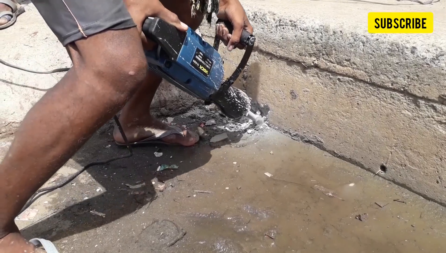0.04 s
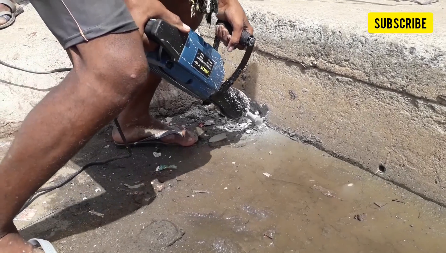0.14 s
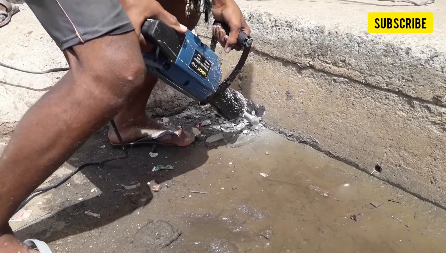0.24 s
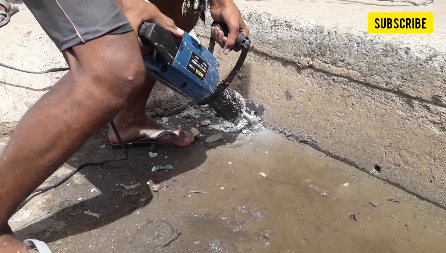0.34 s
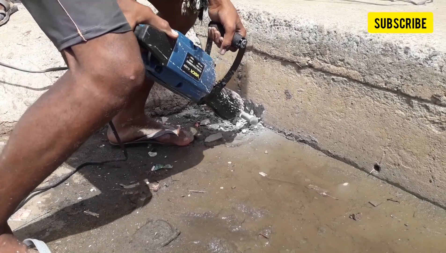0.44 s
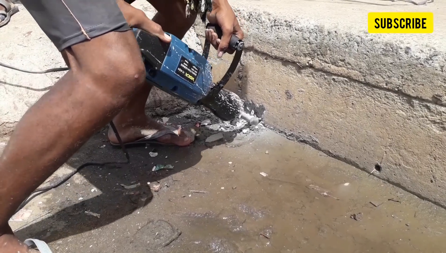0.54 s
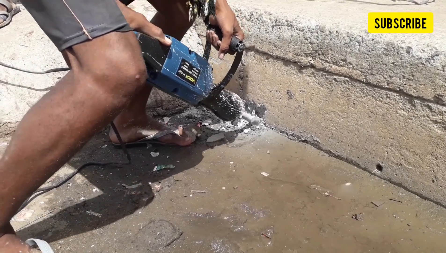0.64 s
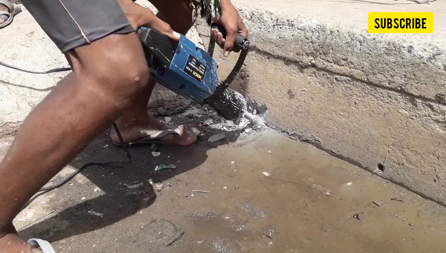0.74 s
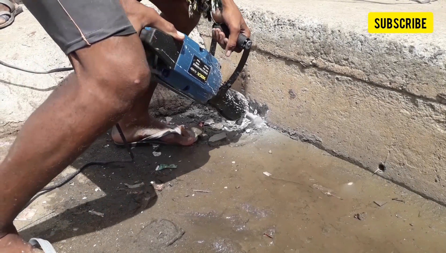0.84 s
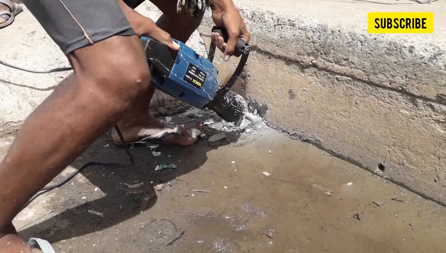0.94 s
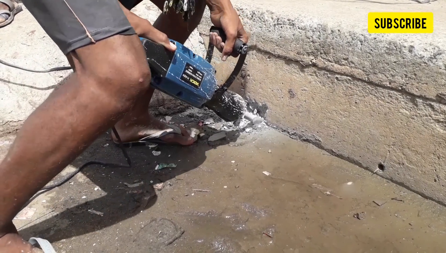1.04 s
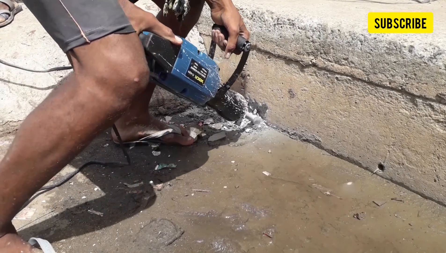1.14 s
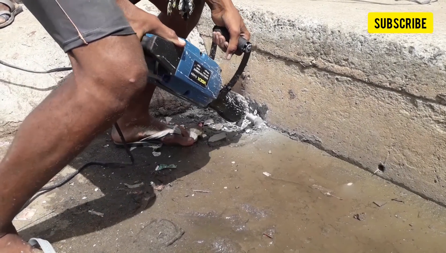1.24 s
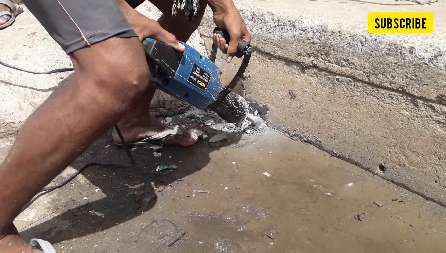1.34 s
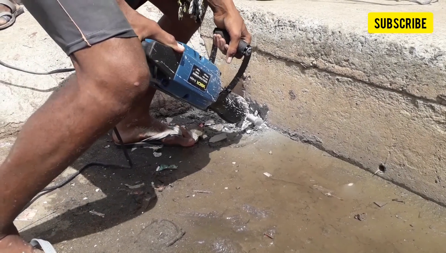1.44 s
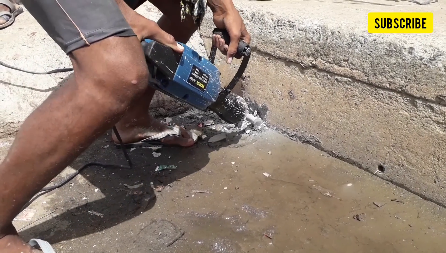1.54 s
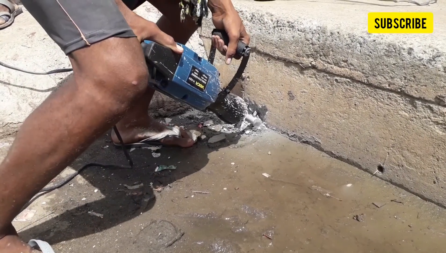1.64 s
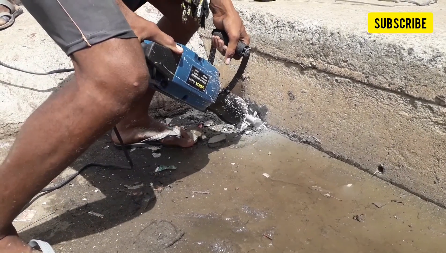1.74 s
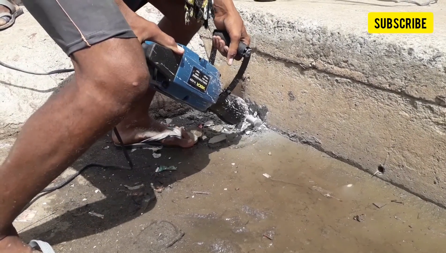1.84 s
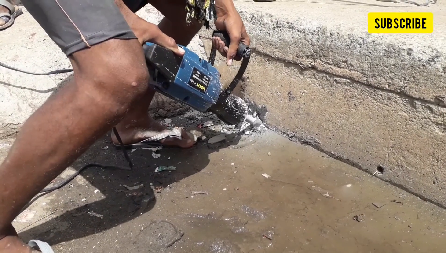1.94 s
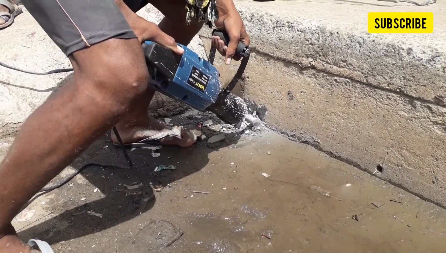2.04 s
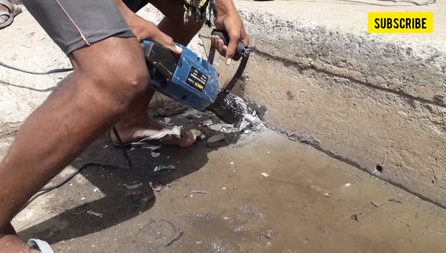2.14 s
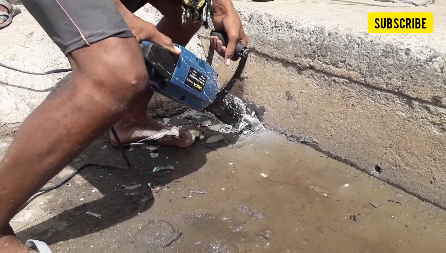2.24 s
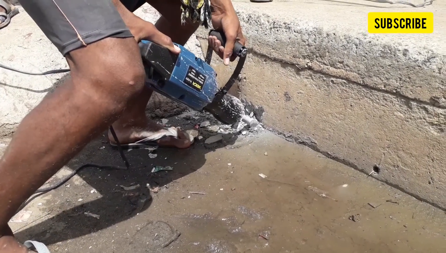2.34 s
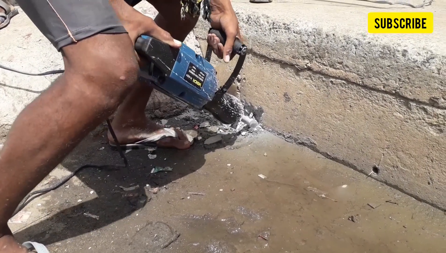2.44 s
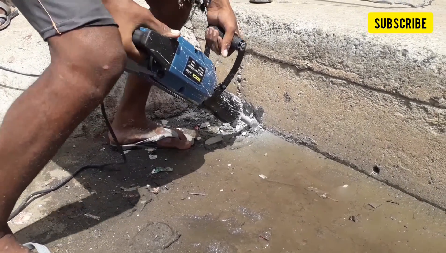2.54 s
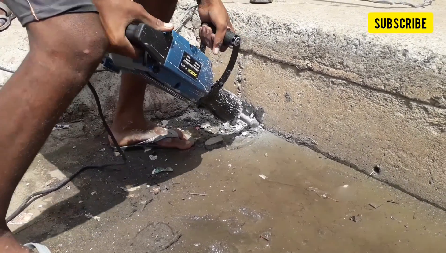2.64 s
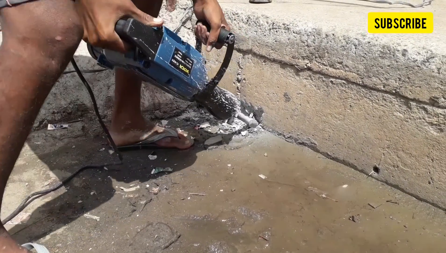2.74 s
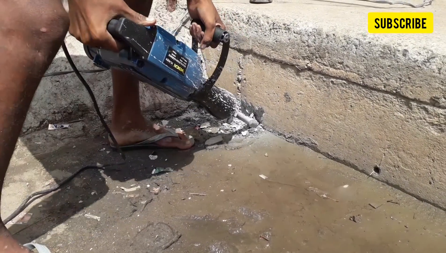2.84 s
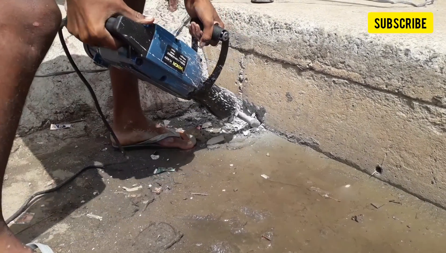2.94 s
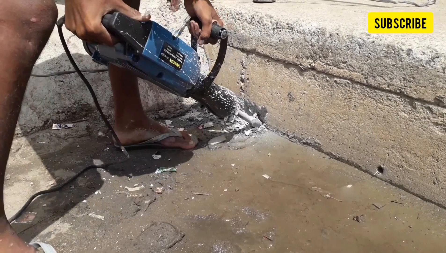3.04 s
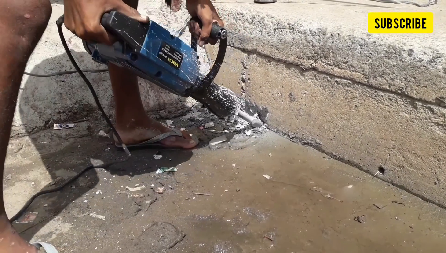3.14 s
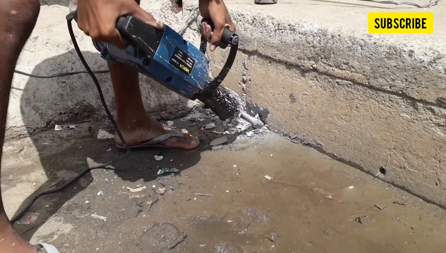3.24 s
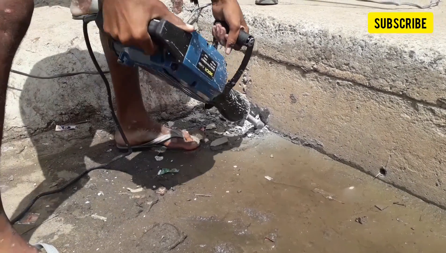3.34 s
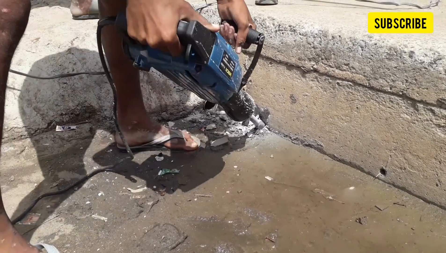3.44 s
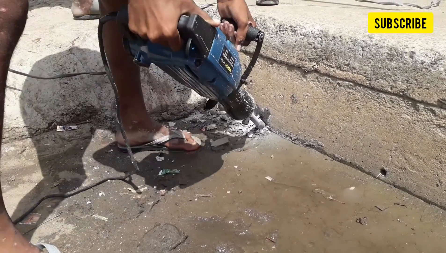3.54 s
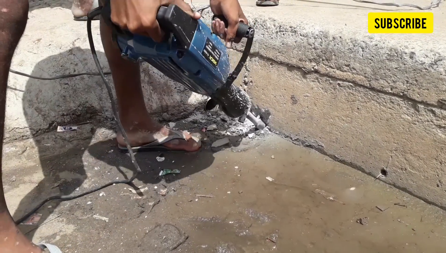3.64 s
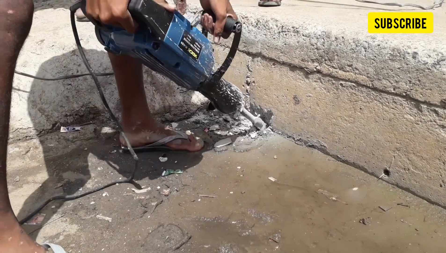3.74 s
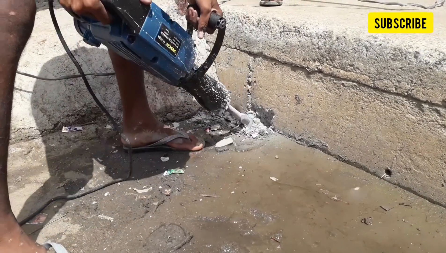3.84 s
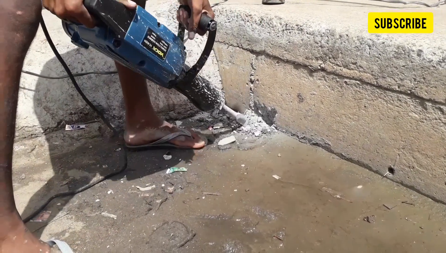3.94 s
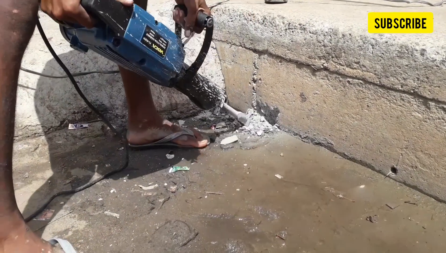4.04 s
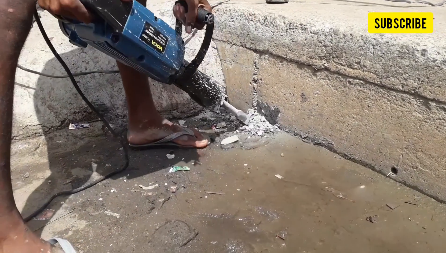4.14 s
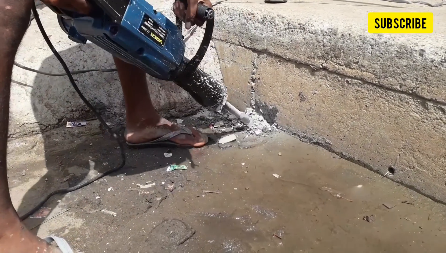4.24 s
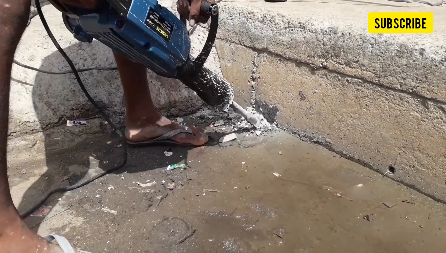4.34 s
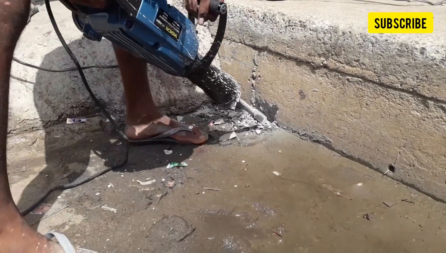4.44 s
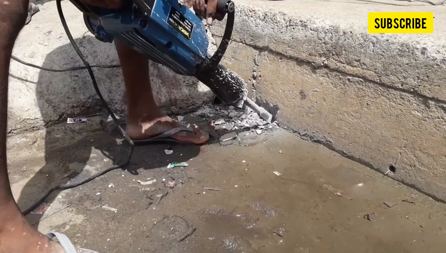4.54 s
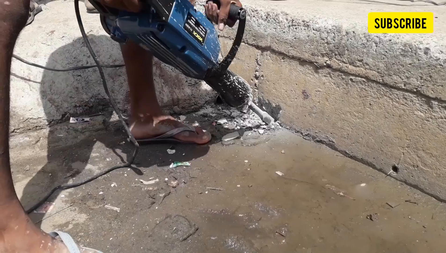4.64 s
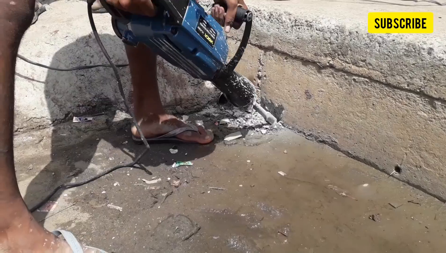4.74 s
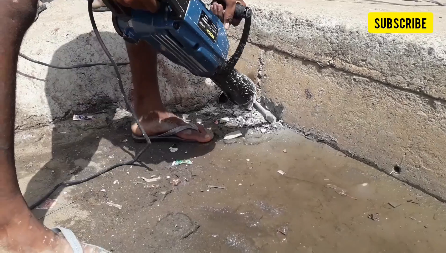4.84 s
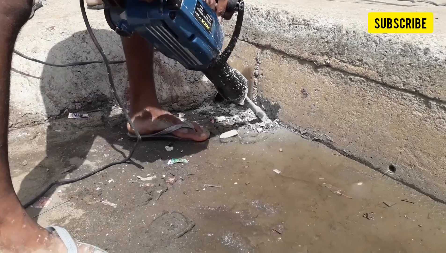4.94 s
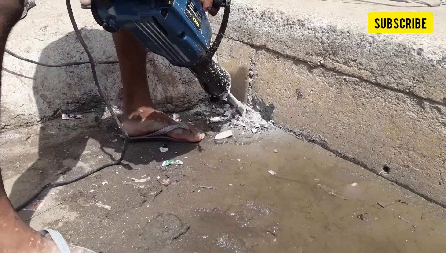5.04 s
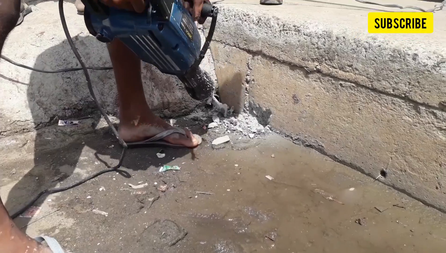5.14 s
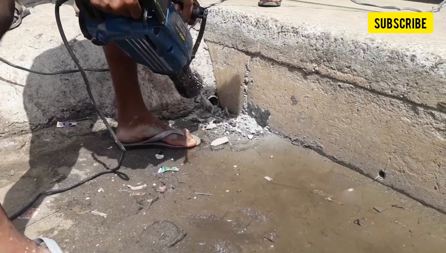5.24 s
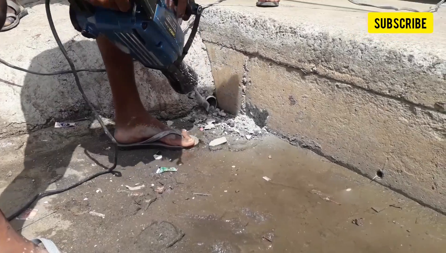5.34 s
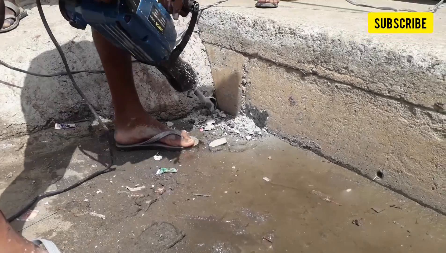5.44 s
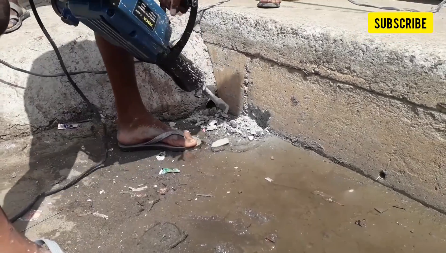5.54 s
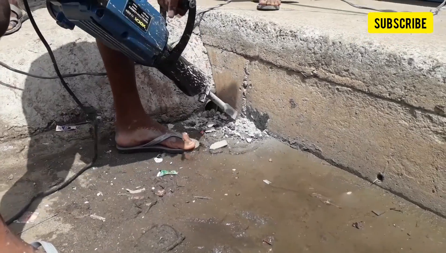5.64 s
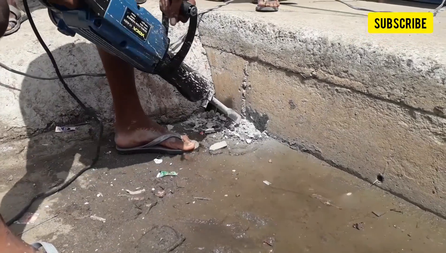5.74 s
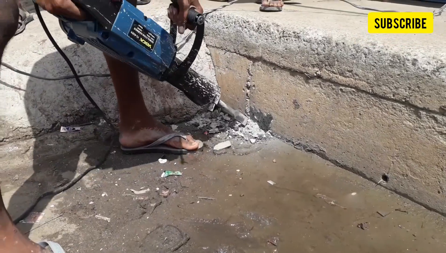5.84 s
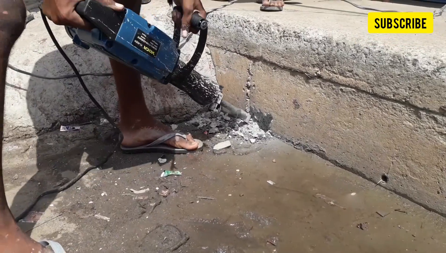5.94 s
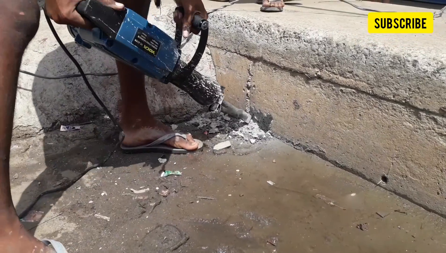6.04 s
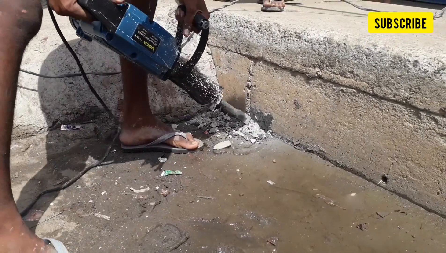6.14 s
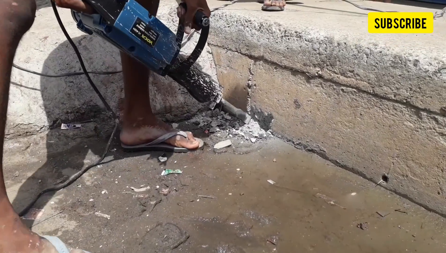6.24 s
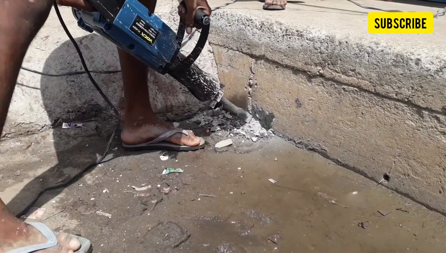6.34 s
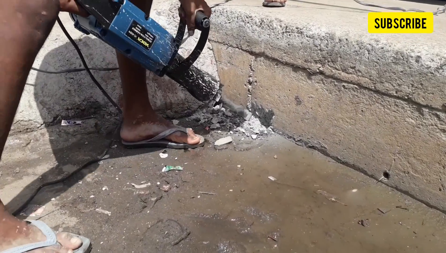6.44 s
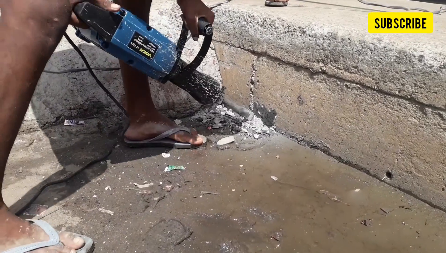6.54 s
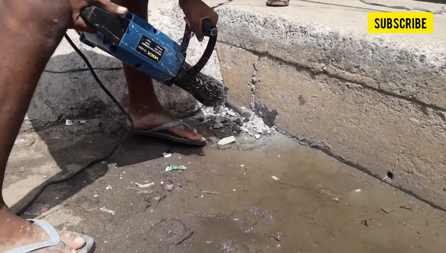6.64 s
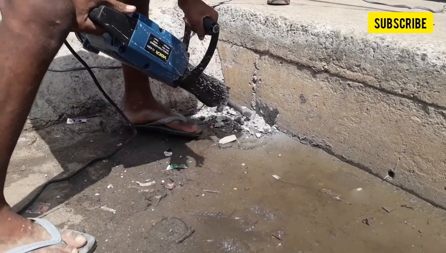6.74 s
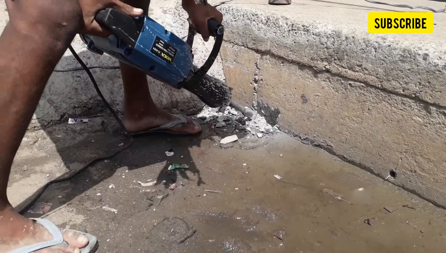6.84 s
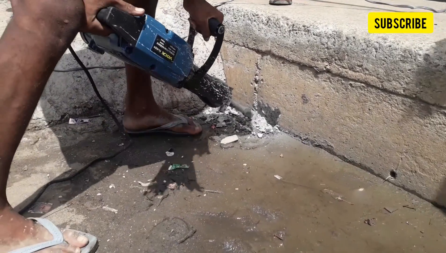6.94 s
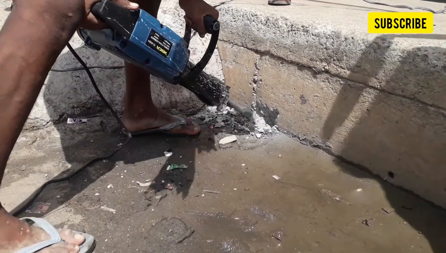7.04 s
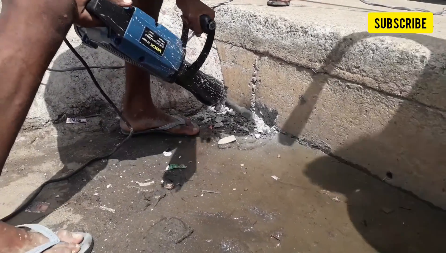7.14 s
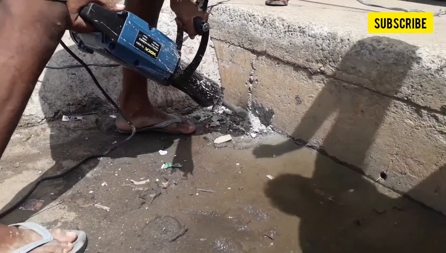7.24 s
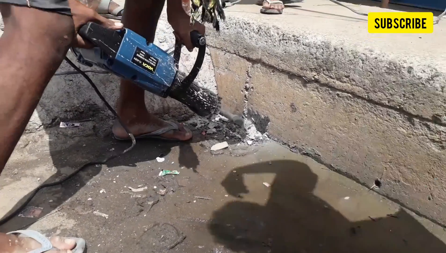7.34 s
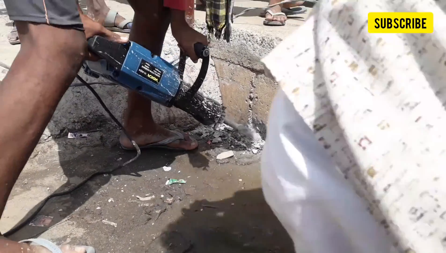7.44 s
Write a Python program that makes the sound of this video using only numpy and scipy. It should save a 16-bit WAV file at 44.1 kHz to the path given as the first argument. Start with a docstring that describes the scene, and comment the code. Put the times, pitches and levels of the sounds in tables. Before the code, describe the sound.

An electric demolition hammer pounds concrete in a rapid roar, coasts down clattering, knocks and scrapes as it is reset, then revs and bites again.

```python
"""An electric demolition hammer chisels a concrete kerb, one blow per crank turn, about 23 a second.
Each blow excites body resonances, crushing noise and chisel modes; gears add hiss, buzz and whine.
The trigger is released and the crank coasts down, the loose piston clattering at both stroke ends.
The chisel knocks and scrapes as it is reset, then the motor spins up and bites again.
Down the road, sums of engine harmonics make one engine idle and another pull away over a rumble."""
import sys
import numpy as np
from scipy import signal
from scipy.fft import rfft, irfft
from scipy.io import wavfile
from scipy.ndimage import uniform_filter1d

SR = 44100
rng = np.random.default_rng(int(sys.argv[2]) if len(sys.argv) > 2 else 0)


def unload_wav(signal):
    """Save mono or channel-first audio to the path in sys.argv[1] as 16-bit WAV at rate SR, clipped to [-1, 1]."""
    wavfile.write(
        sys.argv[1],
        SR,
        np.round(np.clip(np.atleast_2d(signal).T, -1, 1) * 32767).astype(np.int16),
    )


N = 330309
T = np.arange(N) / SR   # time of every sample [s]
GEAR_RATIO = 12         # rotor turns per crank turn
WORKING_RATE = 23.3     # reference crank rate [turns/s]

# crank working, then coasting to a stop: (time [s], rate [turns/s])
FIRST_RUN = [(0.0, 23.46), (1.05, 23.45), (1.35, 23.04), (1.9, 23.02), (2.43, 23.47), (2.52, 19.67),
             (2.63, 14.54), (3.3, 8.07), (3.9, 3.34), (4.15, 0.0)]
# crank spinning up until the load catches it: (time [s], rate [turns/s])
SECOND_RUN = [(6.69, 0.0), (6.8, 13.8), (6.89, 21.7), (6.98, 22.0), (7.03, 24.9), (7.17, 26.0),
              (7.25, 27.2), (7.36, 30.2), (7.43, 27.3), (7.49, 26.6)]
# first stroke of each run: (first run [s], second run [s])
FIRST_STROKES_S = (0.009, 6.796)
# how hard the blows land: (time [s], relative thump level [dB], relative crack level [dB])
FORCE = [(0, -2, 1.5), (.52, -0.04, 1.2), (.57, 0.5, 6), (.69, 2, 5.5), (.74, -1, 2.5), (.82, -2, -2),
         (1.0, .5, 1.5), (1.16, .5, -0.7), (1.33, 1.2, 3.6), (1.85, 0.3, 2), (2.25, 1.5, 3),
         (2.46, 1.5, 3.5), (2.56, -1.5, 3), (2.62, -10, -12), (7.31, -6.5, -5.5), (7.37, -4, 2),
         (7.41, -0.5, 3.5), (7.49, 1.5, 2)]
# chisel modes, two bending families and a top group: (frequency [Hz], relative level [dB], t60 [s])
CHISEL_LOW = [(4900, -38.5, 0.13), (5086, -29, 0.06)]
CHISEL_HIGH = [(6930, -40.5, 0.15), (7615, -35, 0.19)]
CHISEL_TOP = [(12350, -40.5, 0.12), (14300, -34, 0.044), (15000, -58.5, 0.045), (15650, -34, .06)]
# resonances of the gear case: (frequency [Hz], width [Hz], gain [dB])
CASE = [(721, 44, 7), (835, 39, 7), (925, 41, 5.5), (1165, 110, -8), (1321, 80, 6.5), (1530, 25, 8),
        (1613, 120, 4.5), (2034, 43, 4.5), (2280, 270, 4.5), (2440, 46, 5.5), (2710, 58, 9),
        (2930, 140, -2), (3162, 70, 8.5), (3212, 113, 1), (3520, 330, 5.5), (4200, 190, 5.5),
        (5446, 110, 6.5), (6340, 200, 4)]
# resonances of the struck housing and kerb: (frequency [Hz], width [Hz], gain [dB])
BODY = [(234, 66, 5), (454, 41, -15), (565, 180, 4), (669, 27, -7), (758, 68, 5.5), (826.6, 41, 6.5),
        (1057, 158, -6.5), (1370, 130, 1.5), (1666, 57, 8), (1816, 260, -3.5), (1950, 170, 6)]
# resonances of the loose chisel and its holder: (frequency [Hz], width [Hz], gain [dB])
HOLDER = [(357, 65, 5.5), (724, 38, 8), (856, 110, 4), (1130, 75, -3), (1570, 95, 8), (2110, 100, -3),
          (2680, 90, 0), (3440, 140, 12), (3560, 120, 5), (4600, 120, 5)]


def from_db(db):
    """A level in decibels is twenty times the logarithm of an amplitude ratio."""
    return 10 ** (np.asarray(db) / 20)


def rms_one(x):
    """Dividing by the root mean square sets the mean power to 1."""
    return x / np.sqrt(np.mean(x ** 2) + 1e-20)


def in_time(rows):
    """Linear interpolation carries each column of a curve to every sample."""
    s, *columns = np.transpose(rows)
    return [np.interp(T, s, column) for column in columns]


def drift(rate):
    """Low-frequency randomness: Gaussian knots, rate per second, joined by lines; rms 1."""
    knots = rng.standard_normal(8000)
    return rms_one(np.interp(T * rate, np.arange(len(knots)), knots))


def add(track, s, sound):
    """Superposition: a short sound is summed into a track at time s."""
    at = int(np.clip(round(s * SR), 0, N - 1))
    track[at:at + len(sound)] += sound[:N - at]


def colour(x, spectrum, resonances=(), size=4096):
    """Minimum-phase filtering: a causal response of unit energy with given spectrum and resonances."""
    hz = np.maximum(np.arange(size // 2 + 1) * SR / size, 1)
    points = np.array(spectrum)
    db = np.interp(np.log(hz), np.log(points[:, 0]), points[:, 1])
    for centre, width, peak_db in resonances:
        db = db + peak_db / (1 + (2 * (hz - centre) / width) ** 2)
    # folding the cepstrum onto positive time makes the filter causal
    cepstrum = irfft(np.log(from_db(db)))
    cepstrum[1:size // 2] *= 2
    cepstrum[size // 2 + 1:] = 0
    response = irfft(np.exp(rfft(cepstrum)))
    return signal.oaconvolve(x, response / np.linalg.norm(response))[:N]


def shifting(x, spectrum, resonances, sway, rate=22):
    """Resonances move with boundary conditions: they slide sharp and flat as grip and contact change."""
    place = np.clip(drift(rate), -1, 1)
    out = 0
    for k in (-1, 0, 1):      # crossfade between flat, central and sharp tunings
        share = np.maximum(1 - np.abs(place - k), 0)
        tuned = [(hz * (1 + k * sway), width, db) for hz, width, db in resonances]
        out = out + colour(x * share, spectrum, tuned)
    return out


def grit(spread_db):
    """Contact noise: white noise whose level jumps every 16 samples, like uneven tiny contacts; rms 1."""
    steps = np.repeat(rng.standard_normal(N // 16 + 1), 16)[:N]
    return rms_one(rng.standard_normal(N) * from_db(spread_db * steps))


def chatter(per_s, fall_s, bed, uneven=.35, uneven_db=4.0):
    """Repeated impact: uneven steel rebounds, each decaying, over a constant bed of rubbing; rms 1."""
    rate = per_s * np.exp(uneven * drift(150)) * np.ones(N)
    count = np.floor(np.cumsum(rate) / SR)
    ticks = np.diff(count, prepend=0) * from_db(uneven_db * np.clip(drift(300), -2, 2))
    decaying = signal.lfilter([1], [1, -np.exp(-1 / (fall_s * SR))], ticks + 1e-18)
    return rms_one(bed + decaying)


def bursts(rows, fall_s):
    """Exponential decay: each row (time [s], level [dB], length [s]) holds, then dies away."""
    force, t = np.zeros(N), T[:SR // 8]
    for s, db, length in rows:
        add(force, s, from_db(db) * np.exp(-np.maximum(t - length, 0) / fall_s))
    return force


def tone(hz):
    """Phase is the integral of frequency: a sine of rms 1 follows a pitch curve."""
    return np.sqrt(2) * np.sin(2 * np.pi * (np.cumsum(hz) / SR + rng.random()))


def chisel(strikes, modes, width_hz, free_s=0.063, build_s=0.0039):
    """Modal synthesis: each strike (time, level) excites damped modes, blurred by chatter on concrete."""
    out, t = np.zeros(N), T[:SR // 10]
    # the ring builds up, and is choked when the tip is pressed home again
    free = (1 - np.exp(-t / build_s)) / np.sqrt(1 + (t / free_s) ** 6)
    for s, db in strikes:
        for hz, mode_db, t60 in modes:
            strength_db, phase = 2 * rng.standard_normal(2)
            # a random walk of phase broadens the spectral line
            walk = np.sqrt(2 * np.pi * width_hz / SR) * np.cumsum(rng.standard_normal(len(t)))
            swing = np.sin(2 * np.pi * (hz * t + phase) + uniform_filter1d(walk, size=40))
            decay = from_db(db + mode_db + strength_db - 60 * t / t60)
            add(out, s, swing * free * decay)
    return out


def street(floor_db=-51.0, idle_db=-1.0, engine_db=1.5):
    """Harmonic series of firing rates: an idling and a departing engine over filtered-noise rumble."""
    # traffic rumble: (frequency [Hz], relative level [dB])
    rumble_colour = [(15, -73.5), (25, -37.5), (80, -10), (130, -7.5), (205, -13.5), (317, -17),
                     (405, -19.5), (560, -19), (659, -27), (818, -25), (1100, -35), (1520, -38),
                     (1700, -46), (1840, -40.5), (3080, -52), (16000, -60.5)]
    # idling engine: (frequency [Hz], relative level [dB])
    idle_tones = [(96, -52.5), (143, -56), (166, -64.5), (238, -61.5), (287, -64.5), (331, -65.5)]
    # engine pulling away: (time [s], firing rate [Hz], relative level [dB])
    engine = [(5.4, 80, -63), (5.85, 91.4, -46.5), (6.08, 104.3, -50.5), (6.25, 109.1, -44.5),
              (6.45, 120.7, -52.5), (6.62, 133, -49), (6.9, 139.7, -45.5), (7.05, 128.9, -54),
              (7.2, 121, -58.5)]
    # its exhaust: (multiple of the firing rate, relative level [dB])
    exhaust = [(1, 2.5), (1.5, -5.5), (2, -33), (2.5, -12), (3, -18), (4.5, -19.5)]
    firing, level_db = in_time(engine)
    present = np.interp(T, [5.1, 5.45, 7.1, 7.4], [0, 1, 1, 0])
    firing = firing * (1 + 0.00658 * drift(25))
    passing = sum(tone(k * firing) * from_db(level_db + db + min(k * k, 3) * drift(9)) for k, db in exhaust)
    idle = sum(tone(hz * (1 + .008 * drift(9))) * from_db(db + 2.0 * drift(5.4)) for hz, db in idle_tones)
    rumble = colour(rng.standard_normal(N), rumble_colour)
    return from_db(floor_db) * rumble + from_db(idle_db) * idle + from_db(engine_db) * present * passing


def scraping(fade_s=0.046, uneven_db=1.5):
    """Friction noise: between the knocks the tip slides through loose chips."""
    # tip dragged through rubble: (time [s], length [s], relative level [dB])
    drags = [(4.2, 0.31, -61.5), (4.88, 0.092, -57.5), (5.0, .07, -59), (5.117, 0.21, -58),
             (6.28, .12, -69)]
    # colour of the rubble: (frequency [Hz], relative level [dB])
    rubble = [(150, -15), (600, -9), (950, 9.5), (1500, -2), (2400, -1), (3000, -20), (5000, -20),
              (8000, -42), (16000, -54.5)]
    force = 0
    for s, length, db in drags:
        corners = [s - fade_s, s + fade_s, s + length - fade_s, s + length + fade_s]
        force = force + from_db(db) * np.interp(T, corners, [0, 1, 1, 0])
    force = force * from_db(uneven_db * drift(46))
    return colour(force * chatter(per_s=70, fall_s=0.0052, bed=0.71) * grit(spread_db=3.0), rubble, HOLDER)


def holder_notes(level_db=0.0):
    """Selective modal excitation: now and then the holder sings out on a single mode."""
    # notes of the holder: (time [s], frequency [Hz], relative level [dB], t60 [s])
    notes = [(2.6, 1260, -23, .08), (2.692, 4250, -28, 0.08), (2.699, 1290, -27, 0.094),
             (2.778, 957, -36, .25), (3.36, 728, -43, .3), (3.41, 720, -39.5, .3),
             (3.865, 2710, -40.5, .25), (4.92, 813, -42, .12), (5.968, 947, -32, 0.041),
             (6.865, 4250, -29, .1), (6.875, 3330, -27, 0.064), (6.912, 3290, -24, 0.076),
             (6.961, 3320, -16.5, .06)]
    return sum(chisel([(s, db + level_db)], [(hz, 0, t60)], width_hz=24) for s, hz, db, t60 in notes)


def knocks(knock_db=-7.0, low_db=16.0, high_db=1.0, holder_db=19.5, hard_db=-27.5, soft_hz=1800):
    """Impact: the idle chisel drops on concrete and rings its holder; light touches sound duller."""
    # chisel on concrete: (time [s], relative level [dB], ring against the knock [dB], t60 [s])
    contacts = [(4.678, -32.5, -18.5, 0.074), (4.716, -28.5, -12, 0.076), (5.003, -24.5, -8, .08),
                (5.045, -36, -5, 0.061), (5.131, -18.5, -21, 0.091), (5.141, -22, -9, 0.076),
                (5.171, -30, -6, 0.075), (5.215, -29, -5, 0.076), (5.251, -31, -19, 0.074),
                (5.292, -35, -21, 0.087), (5.967, -39, -27, .05), (6.024, -37, -22, 0.096),
                (6.137, -43, -30, .05)]
    # colour of the knocks: (frequency [Hz], relative level [dB])
    knock_colour = [(80, -8), (250, 2.5), (400, 5), (720, 1), (1100, 3.5), (1600, -1.5), (2500, -8),
                    (4200, -14), (6000, -22.5), (8500, -44), (12500, -39), (16000, -42)]
    # holder ringing on after a knock: (frequency [Hz], relative level [dB], t60 [s])
    holder_ring = [(717, -32.5, 0.1), (940, -38, 0.12), (1213, -45, 0.12), (1500, -38, 0.1),
                   (2210, -50, .14), (2710, -50, 0.16), (3350, -54, 0.21), (4200, -59, 0.16),
                   (9800, -68, .14)]
    force, bright, t = np.zeros(N), np.zeros(N), T[:SR // 6]
    for s, db, _, t60 in contacts:
        contact = from_db(db - 60 * t / t60) * (1 - np.exp(-t / 0.0028))
        add(force, s, contact)
        add(bright, s, contact * min(from_db(db - hard_db), 1))
    chips = grit(spread_db=3.5)
    lowpass = signal.butter(1, soft_hz, fs=SR, output="sos")
    dull = signal.sosfiltfilt(lowpass, (force - bright) * chips)
    low = [(s, db + ring + low_db) for s, db, ring, _ in contacts]
    high = [(s, db + ring + high_db) for s, db, ring, _ in contacts]
    holder = [(s, db + holder_db) for s, db, _, _ in contacts]
    steel = chisel(low, CHISEL_LOW, width_hz=32)
    steel += chisel(high, CHISEL_HIGH + CHISEL_TOP[:1], width_hz=30)
    steel += chisel(holder, holder_ring, width_hz=10.4)
    return from_db(knock_db) * colour(bright * chips + dull, knock_colour, HOLDER) + steel


def rattles(rattle_db=-10.0, fall_s=0.0068, tail_db=-15.5, tail_s=0.059, soft_hz=5200):
    """Impact chatter: short runs of metallic ticks, each settling in a soft jangle."""
    # slack parts and loose chisel at rest or start: (time [s], relative level [dB], length [s])
    runs = [(2.6, -19, 0.016), (2.628, -28, 0.011), (2.69, -30, 0.016), (2.762, -22.5, 0.023),
            (3.826, -33.5, 0.0054), (3.847, -30, 0.016), (3.879, -34, 0.024), (3.915, -44, 0.048),
            (4.007, -46, 0.0094), (4.036, -43.5, 0.02), (4.062, -47, 0.026), (4.354, -36.5, 0.0036),
            (4.373, -42, .008), (4.436, -45, .006), (4.476, -41.5, 0.0045), (4.504, -58, 0.0037),
            (6.698, -49, 0.0055), (6.72, -28, 0.023), (6.796, -28, 0.027)]
    # colour of the ticks: (frequency [Hz], relative level [dB])
    slack_colour = [(150, -31), (500, -0.5), (850, 4), (1500, 0), (2600, 5), (3600, -1.5), (5400, -8),
                    (6500, -14), (8000, -26), (9500, -38), (16000, -40)]
    # resonances of the slack parts: (frequency [Hz], width [Hz], gain [dB])
    slack = [(783, 74, 4.5), (955, 40, 14), (1340, 150, 9), (1526, 105, 13.5), (2625, 67, 9), (3190, 53, 8),
             (3550, 80, 10.5), (4260, 40, 9), (4620, 110, 10), (5550, 73, 12)]
    ticks = chatter(per_s=260, fall_s=.002, bed=.4) * grit(spread_db=1.5)
    force = bursts(runs, fall_s) + from_db(tail_db) * bursts(runs, tail_s)
    softened = signal.sosfilt(signal.butter(2, soft_hz, fs=SR, output="sos"), force * ticks)
    return from_db(rattle_db) * colour(softened, slack_colour, slack)


def jolts(jolt_db=10.0):
    """Impulse response of a heavy mass: dull bumps as the tool lurches in the hands."""
    # bumps of the tool: (time [s], relative level [dB])
    bumps = [(1.562, -14), (2.388, -14), (2.615, -10), (7.409, -11.5)]
    # colour of the bumps: (frequency [Hz], relative level [dB])
    jolt_colour = [(8, -59), (28, -24), (60, -8.5), (110, -4), (170, 5.5), (300, -27), (1000, -60)]
    kicks = np.zeros(N)
    for s, db in bumps:
        add(kicks, s, from_db([db + jolt_db]))
    return colour(kicks, jolt_colour)


def crank_rate():
    """Kinematics: crank turns per second at every sample, one run after the other."""
    return in_time(FIRST_RUN)[0] + in_time(SECOND_RUN)[0]


def crank_turns():
    """Angle is the integral of speed: crank turns counted from the first stroke of each run."""
    turns = np.cumsum(crank_rate()) / SR
    first, second = np.interp(FIRST_STROKES_S, T, turns)
    return turns - np.where(T < SECOND_RUN[0][0], first, second)


def speed_decades():
    """Logarithmic speed scale: crank rate against the working rate, in powers of ten."""
    return np.log10(np.maximum(crank_rate(), 1e-3) / WORKING_RATE)


def strokes(turn=0):
    """Periodic excitation: the moments at which the crank passes a given point of its turn."""
    times = []
    for run, first_s in zip((FIRST_RUN, SECOND_RUN), FIRST_STROKES_S):
        turns = np.cumsum(in_time(run)[0]) / SR
        turns = turns - np.interp(first_s, T, turns) - turn
        times.extend(T[1:][np.diff(np.floor(turns)) > 0])
    return np.array(times)


def biting(s):
    """Contact condition: 1 while the tip is pressed home, so each stroke is a blow, else 0."""
    # spans of contact: (start [s], end [s])
    bites = [(-1, 2.65), (7.29, 8)]
    return sum((s > start) & (s < end) for start, end in bites).astype(float)


def blows():
    """Periodic impact: one blow per turn while biting, as rows (time, thump dB, crack dB)."""
    s = strokes()
    s = s[biting(s) > 0]
    return np.transpose([s] + [np.interp(s, T, db) for db in in_time(FORCE)])


def compression():
    """Air spring: the cushion, squeezed just before each blow, loads the drive from 0 to about 1."""
    lead_s, rise_s, release_s = .004, .0055, .0018
    load, t = np.zeros(N), T[:SR // 20] - T[SR // 30]
    squeeze = np.exp(-.5 * (t / np.where(t < 0, rise_s, release_s)) ** 2)
    for s, db, _ in blows()[1:]:
        add(load, s - lead_s + t[0], min(from_db(db), 1) * squeeze)
    return load


def rotor_rate(load):
    """Rotational inertia: compression drags the rotor with a lag; unloaded, it surges twice a crank turn."""
    sag, lag_s, inertia_s = .13, .0025, .012
    loaded_wobble, free_wobble, surge = .02, .05, .05      # shares of the rate
    keep, working = np.exp(-1 / (inertia_s * SR)), biting(T)
    drag = signal.lfilter([1 - keep], [1, -keep], np.interp(T - lag_s, T, load))
    wobble = np.where(working, loaded_wobble, free_wobble) * drift(700)      # gear play
    wobble = wobble + (1 - working) * surge * np.sin(4 * np.pi * crank_turns())
    # while biting, the mean drag is already part of the crank rate
    extra_drag = drag - working * drag[:2 * SR].mean()
    return GEAR_RATIO * crank_rate() * (1 - sag * extra_drag + wobble)


def fan(fan_db=-38.0, db_per_decade=89.0):
    """Aerodynamic noise rises steeply with speed: the fan roars while the motor races unloaded."""
    # colour of the roar: (frequency [Hz], relative level [dB])
    fan_colour = [(200, -17), (900, -33), (1550, 3), (2300, 7), (2900, -32), (4200, -3), (6000, -23),
                  (9500, -33), (13000, -27), (16000, -37)]
    unloaded = uniform_filter1d(1 - biting(T), size=SR // 8)
    roar = from_db(fan_db + db_per_decade * speed_decades()) * rng.standard_normal(N)
    return colour(unloaded * roar, fan_colour)


def tooth_contact():
    """Backlash: the unloaded drive's gain drops as gears go slack near dead centre and swells between."""
    # slack points: (place in the turn [0-1], width [turns], level [dB])
    dead_centres = [(.47, .06, -8), (.94, .045, -4)]
    turns, db = crank_turns(), 0
    for place, width, dip_db in dead_centres:
        from_centre = (turns - place + .5) % 1 - .5
        db = db + dip_db * (np.exp(-.5 * (from_centre / width) ** 2) - 2 * width)
    return from_db(db * (1 - biting(T)))


def free_case(x, spectrum, boost):
    """Resonance under changing contact: the case colours a sound, its peaks scaled by boost."""
    return shifting(x, spectrum, [(hz, width, boost * db) for hz, width, db in CASE], sway=.02)


def soften(x, soft_hz=5400, brisk_rate=15.7):
    """Contact time limits bandwidth: slowly turning parts meet softly and lose their treble."""
    brisk = np.clip(crank_rate() / brisk_rate, 0, 1) ** 2
    dull = signal.sosfiltfilt(signal.butter(3, soft_hz, fs=SR, output="sos"), x)
    return dull + brisk * (x - dull)


def drive_levels(start_db=28.5, start_s=0.053):
    """Power laws of speed: gear noise and whine in dB grow with speed and work; the motor start growls."""
    # levels before later gains; "bite" is the extra while chiselling
    gear_db, gear_db_per_decade, gear_bite_db = -40.5, 15, 9
    whine_db, whine_db_per_decade, whine_bite_db = -43.5, 27, 5
    stall_rate = 1.4        # crank turns/s around which the gears fade out
    switch_on_s = 0.049     # time the motor takes to engage
    decades, working = speed_decades(), uniform_filter1d(biting(T), size=SR // 20)
    since_start = T - SECOND_RUN[0][0]
    coasting = 1 / (1 + (stall_rate / (WORKING_RATE * 10 ** decades)) ** 2)
    engaging = np.clip(since_start / switch_on_s, 1e-3, 1)
    turning_db = 20 * np.log10(np.where(since_start < 0, coasting, engaging))
    kick_db = start_db * (since_start > 0) * np.exp(-np.abs(since_start) / start_s)
    noise_db = gear_db + gear_db_per_decade * decades + gear_bite_db * working + kick_db + turning_db
    return noise_db, whine_db + whine_db_per_decade * decades + whine_bite_db * working


def mesh(rotor, load):
    """Tooth-passing tone: the gear mesh squeals downward as compression drags the rotor, rough with scuffing."""
    # squeal under compression, growing as the tool is leaned on: (time [s], extra level [dB])
    squeal = [(0.5, 14.5), (1.3, 19.5)]
    mesh_db, db_per_decade, free_db = -53.5, 27, 8.0      # free_db: extra when unloaded
    strain = np.interp(T - .0022, T, load) ** .55
    db = mesh_db + db_per_decade * speed_decades() + in_time(squeal)[0] * strain + free_db * (1 - biting(T))
    teeth = tone(12 * rotor) * (1 + .55 * drift(900))     # 12 teeth
    return teeth * from_db(db + 1.5 * drift(200))


def drive(flutter_db=3.5, buzz_db=-7.5, load_db=5.0):
    """Gear orders: hiss, buzz and whine through the case, most orders swelling under compression."""
    # gear and fan tones: (multiple of the rotor rate, relative level [dB], extra under compression [dB])
    orders = [(3, -19.5, 7), (6, -11, 12.5), (8, -5.5, -2), (18, -29.5, 29.5)]
    # colour of the gear noise: (frequency [Hz], relative level [dB])
    gear_colour = [(60, -10.5), (200, 5.5), (450, 1.5), (800, 1), (2200, -4), (4200, -7), (5200, -9),
                   (6500, -16.5), (8000, -20), (9300, -30.5), (12500, -24.5), (16000, -37)]
    # housing panel that the mesh sings through: (frequency [Hz], width [Hz], gain [dB])
    panel = [(3420, 460, 13.5), (3800, 250, 4), (4230, 280, 12.5)]
    (noise_db, whine_db), load = drive_levels(), compression()
    rotor = rotor_rate(load)
    ticks = np.diff(np.floor(np.cumsum(rotor) / SR), prepend=0)      # one knock of gear play per rotor turn
    buzz = signal.oaconvolve(ticks, rng.standard_normal(SR // 100))[:N]
    buzz = rms_one(signal.sosfilt(signal.butter(2, 700, "high", fs=SR, output="sos"), buzz))
    uneven_db = 2 * drift(150)
    hiss = grit(spread_db=3.0)
    teeth = (hiss + from_db(buzz_db) * buzz) * from_db(noise_db + load_db * load + uneven_db)
    whine = 0
    for k, db, extra_db in orders:
        whine = whine + tone(k * rotor) * from_db(db + extra_db * load + flutter_db * drift(150))
    flat = [(100, 0), (16000, 0)]
    noise = soften(free_case(teeth, gear_colour, boost=0.8))
    return noise + colour(from_db(whine_db) * whine, flat, CASE) + colour(mesh(rotor, load), flat, panel)


def singing(sway=0.029, flutter_db=3.0):
    """Frequency modulation: unloaded gear tones slide as the crank slows and recovers in each turn; rms 1."""
    # unloaded gear teeth: (multiple of the rotor rate, relative level [dB])
    free_orders = [(6, -6), (12, -5), (18, -2), (24, -3), (30, -5)]
    rate, play = crank_rate(), .065
    within_turn = sway * np.sin(2 * np.pi * np.cumsum(rate) / SR)
    rotor = GEAR_RATIO * rate * (1 + within_turn + play * drift(600))
    return rms_one(sum(tone(k * rotor) * from_db(db + flutter_db * drift(30)) for k, db in free_orders))


def clatter(clatter_db=-13.5, fall_s=0.0049, longest_s=0.063):
    """Free impact: with nothing to strike, the piston chatters at both stroke ends and the gears sing along."""
    # last slow strokes of the loose piston: (time [s], relative level [dB], length [s])
    last_strokes = [(3.321, -27, 0.052), (3.384, -28.5, 0.037), (3.455, -26.5, 0.049),
                    (3.531, -27.5, 0.0099), (3.55, -33.5, 0.031), (3.61, -37, 0.012), (3.63, -31, 0.01),
                    (3.641, -24, 0.0077), (3.655, -30, 0.042), (3.714, -31.5, 0.014), (3.732, -33, 0.069)]
    # colour of the clatter: (frequency [Hz], relative level [dB])
    loose_colour = [(100, -36), (450, -6), (900, 10), (2500, 7.5), (4200, 4.5), (5400, 0.5), (6500, -6.5),
                    (8000, -10.5), (9500, -39), (12300, -41), (16000, -37)]
    stroke_db, db_per_decade = -16.5, 19.5      # an empty stroke at working rate; rise with speed
    length_turns = 0.32                         # share of a turn that a stroke lasts
    return_turn, return_db = .52, -4            # place and relative level of the return stroke
    crawl_rate = 8.1    # turns/s; slower strokes are uneven and come from the table
    rows, rate, decades = list(last_strokes), crank_rate(), speed_decades()
    for turn, end_db in ((0, 0), (return_turn, return_db)):
        times = strokes(turn)
        times = times[np.interp(times, T, rate) > crawl_rate]
        weak = np.interp(times, T, in_time(FORCE)[0]) < -5
        for s in times[weak | (biting(times) == 0)]:
            db = stroke_db + end_db + db_per_decade * np.interp(s, T, decades)
            rows.append((s, db, min(length_turns / np.interp(s, T, rate), longest_s)))
    force = bursts(rows, fall_s)
    rebounds = chatter(per_s=140, fall_s=.003, bed=.7) * grit(spread_db=1.2)
    gears = from_db(-12.0) * uniform_filter1d(force, size=SR // 25) * singing()
    return from_db(clatter_db) * soften(free_case(force * rebounds + gears, loose_colour, boost=1.0))


def landed():
    """Irregular impact: the free piston lands a little early or late, some blows meeting solid stone."""
    # blows on solid stone: (time [s], extra thump level [dB], extra crack level [dB])
    hard_blows = [(.263, 1, 0.5), (.563, 0.5, 0.5), (.605, 1, 0), (.69, -1, 0.5), (.861, 1.5, 4),
                  (.99, 1, 1.5), (1.075, -1, 3), (1.204, 1, 2.5), (1.377, 1, 2.5), (1.68, 0.5, 0),
                  (1.767, 1, 1.5), (2.457, -2, 1)]
    jitter_s = .0003
    rows = blows()
    for s, thump_db, crack_db in hard_blows:
        rows[np.argmin(abs(rows[:, 0] - s))] += [0, thump_db, crack_db]
    return rows + np.outer(rng.standard_normal(len(rows)), [jitter_s, 0, 0])


def ringing(hits, low_db=-1.5, high_db=0.0, top_db=3.5):
    """Variable damping: the chisel rings more or less freely as it shifts in the hole."""
    # chisel loose in the hole: (time [s], relative low ring level [dB], relative high ring level [dB])
    ring_outs = [(.35, 9, 9.5), (.478, 5, 11.5), (.563, -2, 5.5), (.861, -1, 14.5), (.947, 10, 12),
                 (1.075, 15.5, 7), (1.204, 8.5, 10.5), (1.55, 12, -3.5), (1.767, 6, 11), (1.941, 7.5, 9.5),
                 (2.286, 16, 1.5), (2.457, 7, 14), (2.505, 13.5, 13.5), (7.39, 10, 11), (7.443, 19.5, 9.5)]
    usual_db, spread_db = [-3.0, -4.5], 4.0      # low and high ring of all other blows
    s, _, crack = hits.T
    low, high = (rng.standard_normal((len(s), 2)) * spread_db + usual_db).T + np.minimum(crack, 0)
    for when, loose_low, loose_high in ring_outs:
        loose = abs(s - when) < .021
        low[loose], high[loose] = loose_low, loose_high
    return (chisel(zip(s, low + low_db), CHISEL_LOW, width_hz=60)
            + chisel(zip(s, high + high_db), CHISEL_HIGH, width_hz=110, free_s=0.014)
            + chisel(zip(s, crack + top_db), CHISEL_TOP, width_hz=50, free_s=0.038))


def cracks(hits, crack_db=-20.0, bite_s=0.00032, crush_s=0.0037, fall_s=0.0027, tail_db=2.5, tail_t60=0.048):
    """Fracture noise: the tip crushes concrete for a few milliseconds, then chips and steel rattle out."""
    # colour of the crushing: (frequency [Hz], relative level [dB])
    crack_colour = [(100, -30.5), (300, -4.5), (700, -9.5), (1100, 4), (1500, 3), (2200, -4.5),
                    (3100, -2.5), (4500, -1), (5600, -9.5), (7300, -9), (8600, -22), (10400, -24),
                    (11900, -12.5), (15700, -13.5)]
    force, t = np.zeros(N), T[:SR // 10]
    crush = np.exp(-np.maximum(t - crush_s, 0) / fall_s)
    shape = (1 - np.exp(-t / bite_s)) * np.maximum(crush, from_db(tail_db - 60 * t / tail_t60))
    for s, _, db in hits:
        add(force, s, from_db(db + .8 * rng.standard_normal()) * shape)
    sliding = from_db(-19.0) * compression()      # the shank rubs in its holder before each blow
    noise = (force + sliding) * grit(spread_db=2.0)
    return from_db(crack_db) * shifting(noise, crack_colour, BODY, sway=.025)


def thumps(hits, thump_db=8.0, rebound_s=0.00318, rebound_share=0.4, jitter_s=.00006, uneven_db=0.23):
    """Impulse response: each blow kicks kerb and housing; a rebound follows a few milliseconds later."""
    # colour of the thump: (frequency [Hz], relative level [dB])
    thump_colour = [(30, -52), (80, -16.5), (130, -13), (190, 3), (270, -2), (360, 1.5), (460, -5.5),
                    (580, -3), (720, -5), (860, -3.5), (1080, -11), (1500, -29), (2300, -30.5), (6000, -39)]
    kicks = np.zeros(N)
    for (s, db, _), chance in zip(hits, rng.standard_normal((len(hits), 3))):
        db = db + uneven_db * chance[2]
        add(kicks, s, from_db([db]))
        add(kicks, s + rebound_s + jitter_s * chance[0], rebound_share * from_db([db + chance[1]]))
    return -from_db(thump_db) * colour(kicks, thump_colour, BODY)


def scene():
    """Superposition of central sources; only the treble of the blows differs between the channels."""
    hits = landed()
    sharp = cracks(hits) + ringing(hits)
    motor = (drive() + fan()) * tooth_contact()
    mid = thumps(hits) + jolts() + sharp + motor + clatter() + rattles()
    mid = mid + knocks() + holder_notes() + scraping() + street()
    treble = signal.sosfilt(signal.cheby1(8, 1, 5200, "high", fs=SR, output="sos"), sharp)
    side = from_db(-14.0) * np.interp(T - .0023, T, treble) * drift(300)
    return np.array([mid + side, mid - side])


def record(dry, top=1.0, cutoff_hz=15900):
    """Saturation and band limiting: peaks are rounded, then the top of the spectrum is cut."""
    rounded = top * np.tanh(dry / top)
    return signal.sosfilt(signal.ellip(10, .2, 70, cutoff_hz, fs=SR, output="sos"), rounded)


dry = scene()
out = record(dry)
unload_wav(out)
```